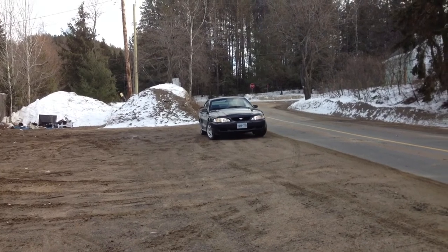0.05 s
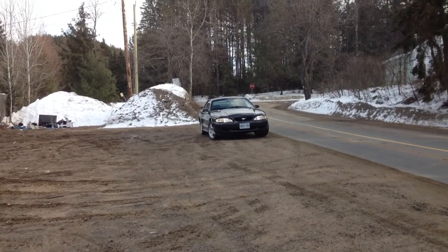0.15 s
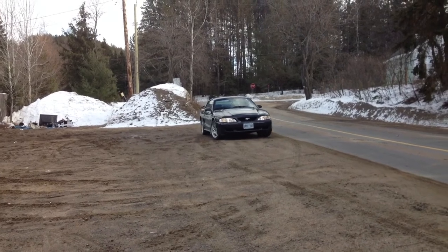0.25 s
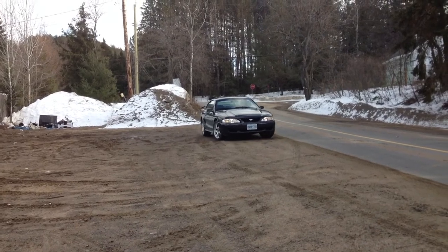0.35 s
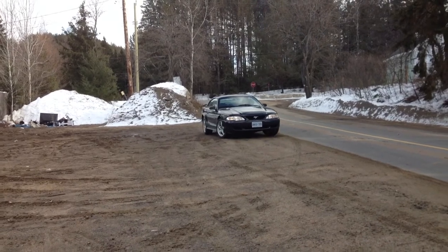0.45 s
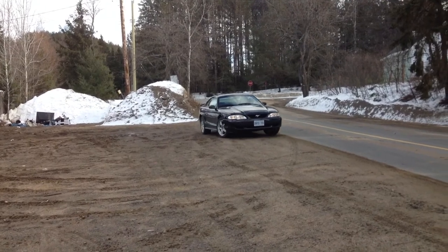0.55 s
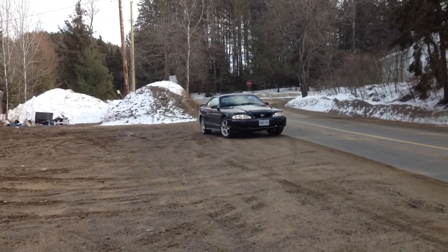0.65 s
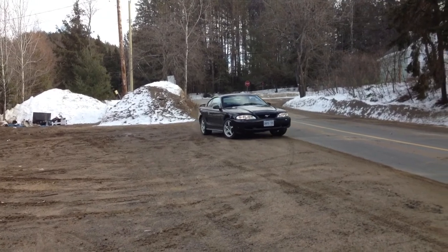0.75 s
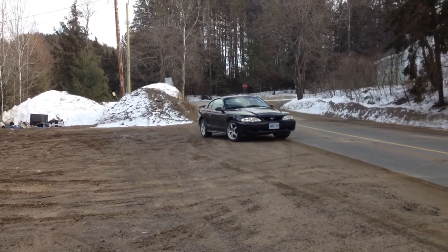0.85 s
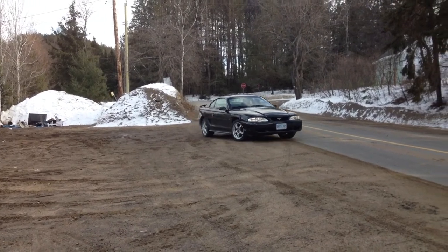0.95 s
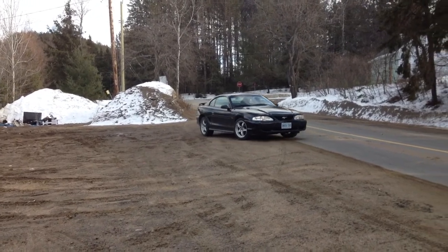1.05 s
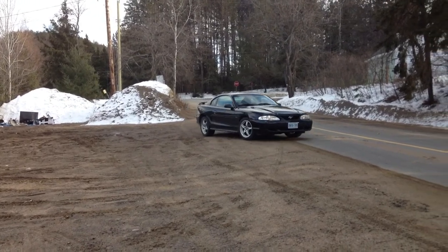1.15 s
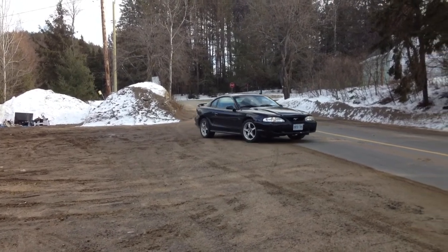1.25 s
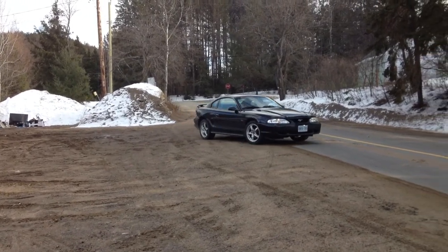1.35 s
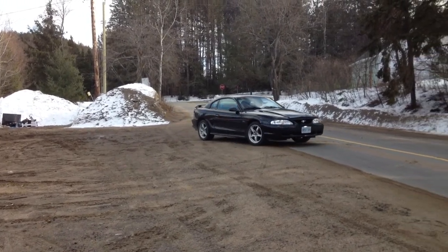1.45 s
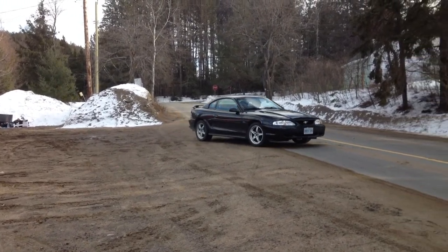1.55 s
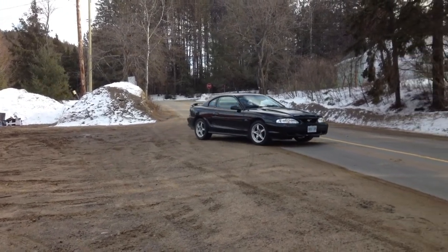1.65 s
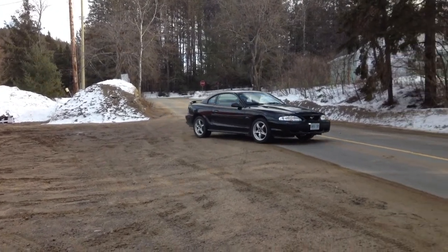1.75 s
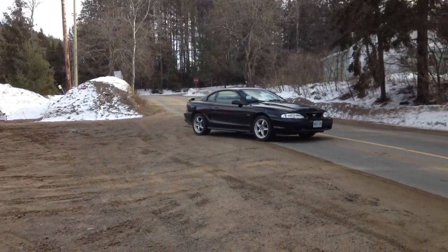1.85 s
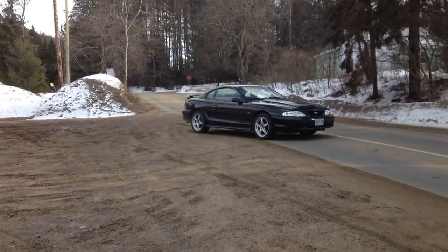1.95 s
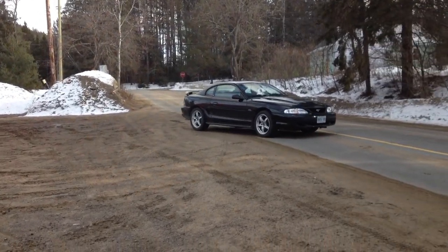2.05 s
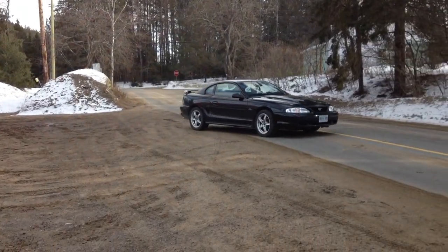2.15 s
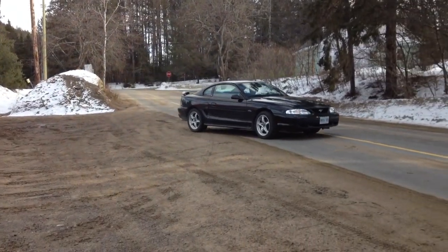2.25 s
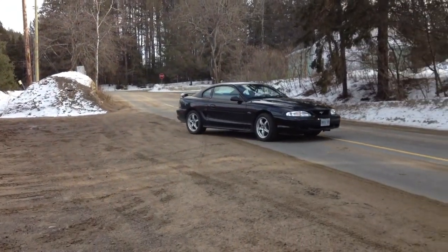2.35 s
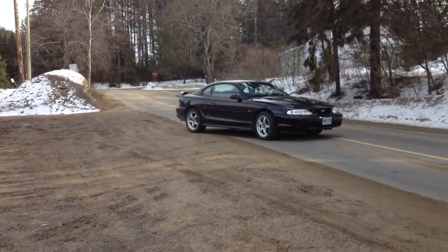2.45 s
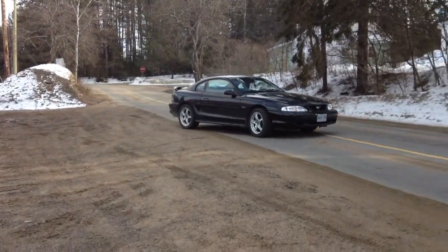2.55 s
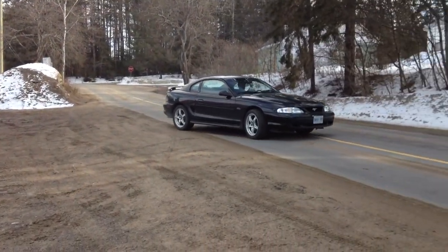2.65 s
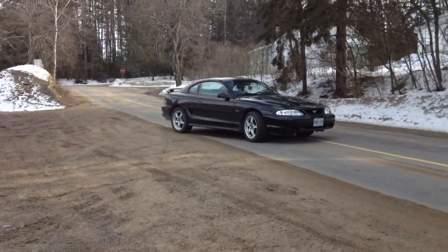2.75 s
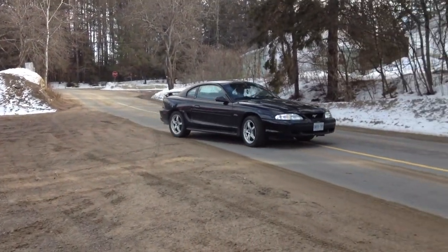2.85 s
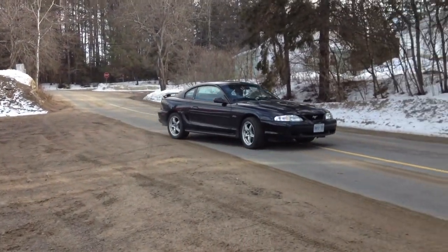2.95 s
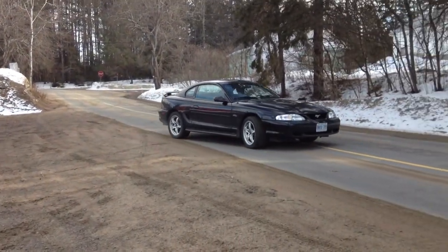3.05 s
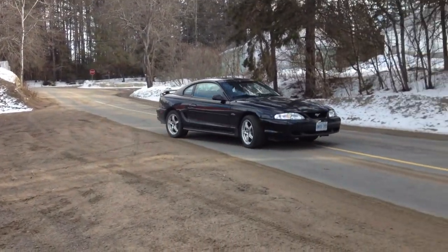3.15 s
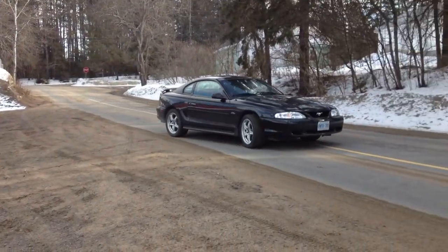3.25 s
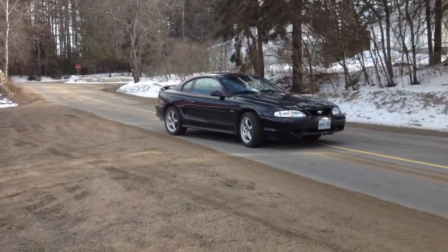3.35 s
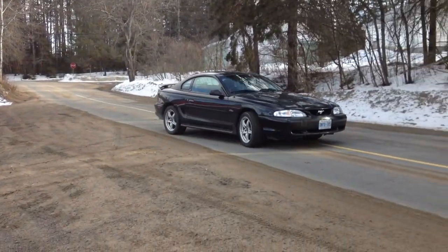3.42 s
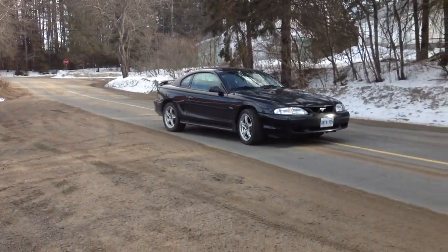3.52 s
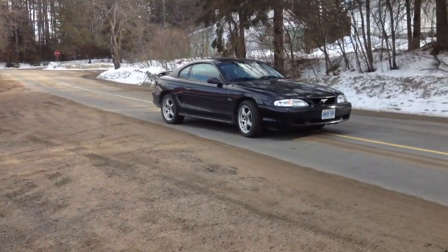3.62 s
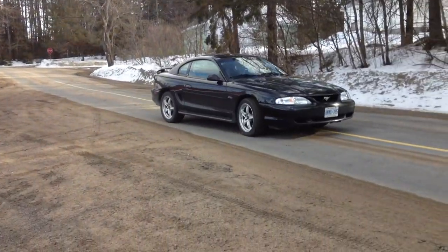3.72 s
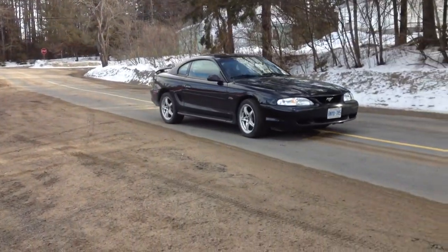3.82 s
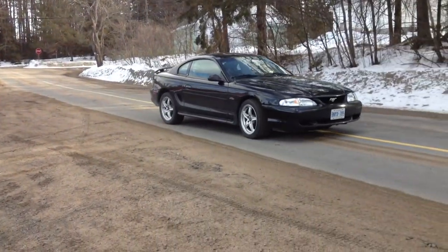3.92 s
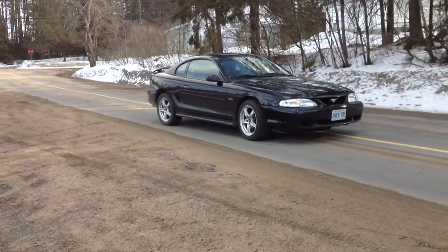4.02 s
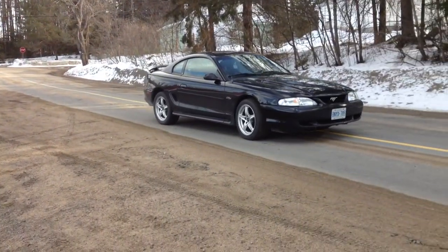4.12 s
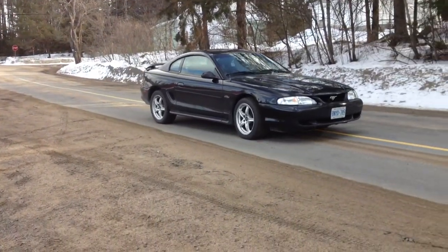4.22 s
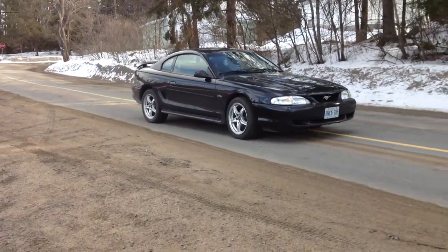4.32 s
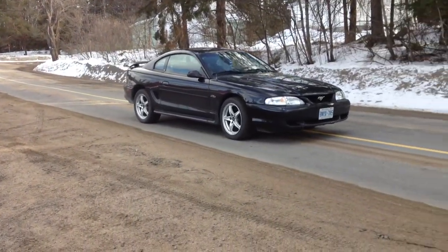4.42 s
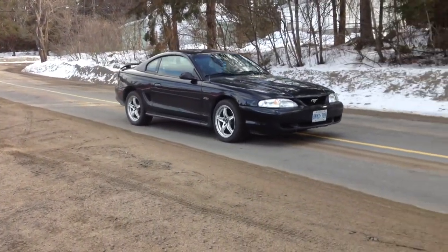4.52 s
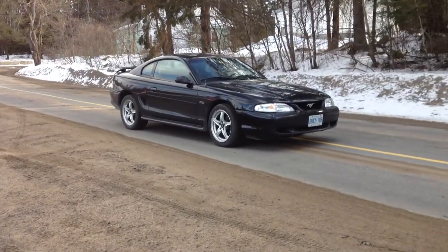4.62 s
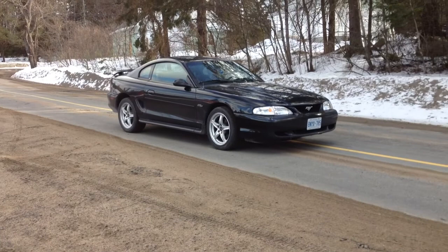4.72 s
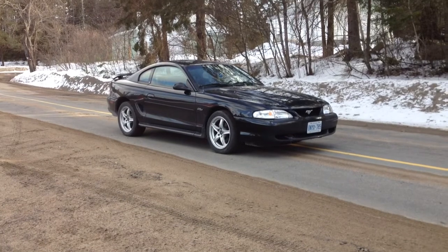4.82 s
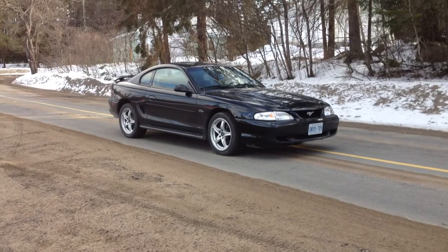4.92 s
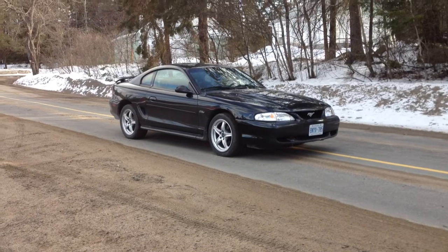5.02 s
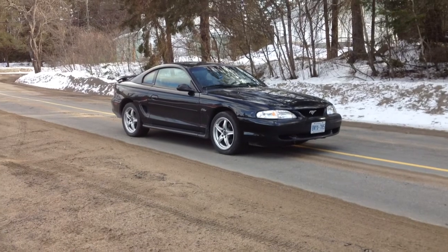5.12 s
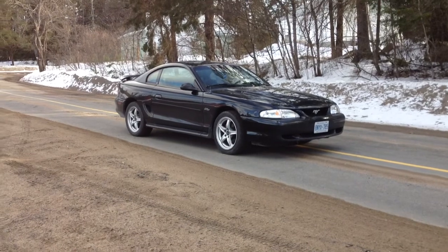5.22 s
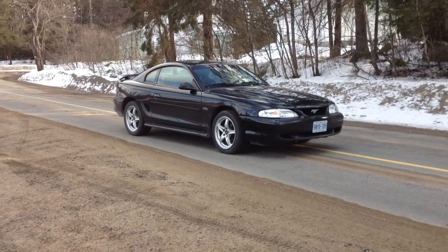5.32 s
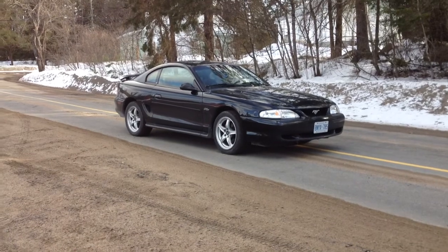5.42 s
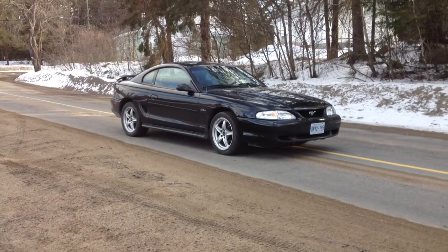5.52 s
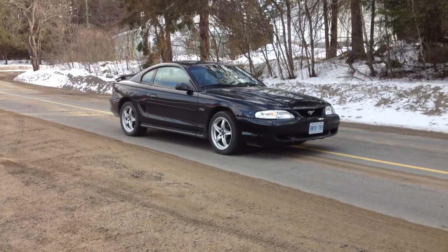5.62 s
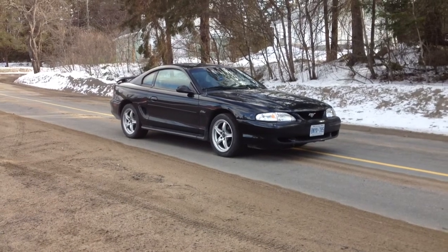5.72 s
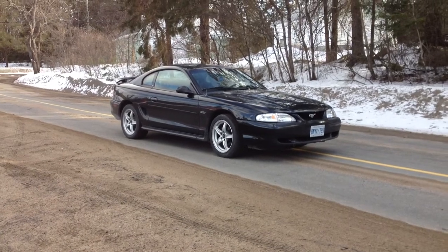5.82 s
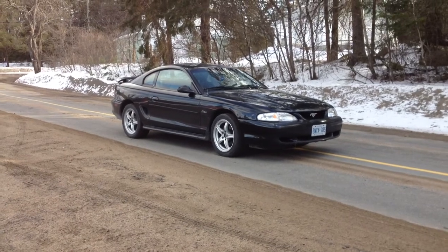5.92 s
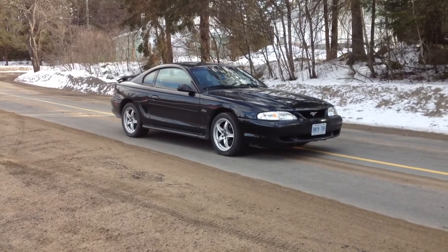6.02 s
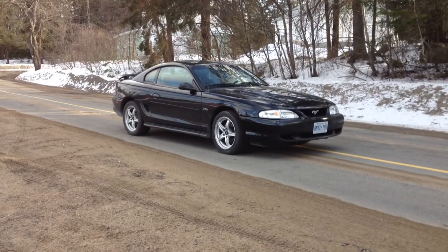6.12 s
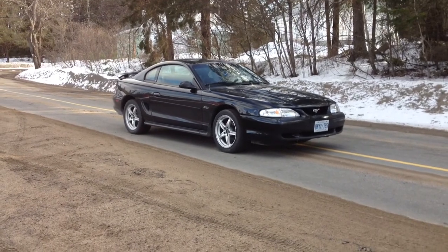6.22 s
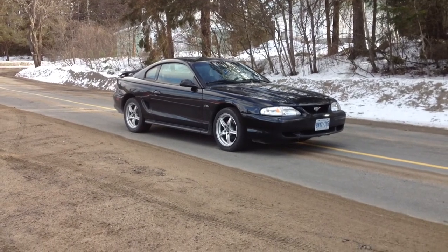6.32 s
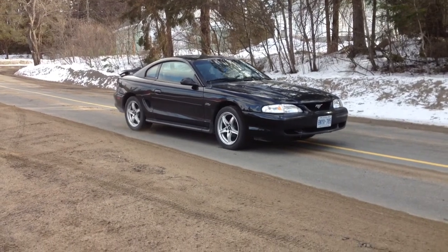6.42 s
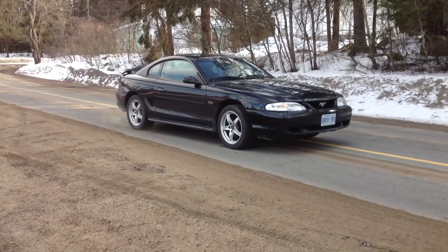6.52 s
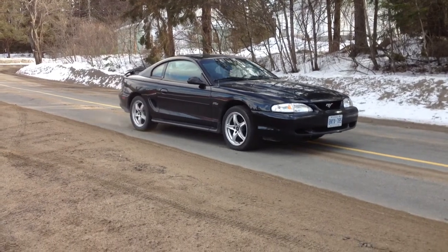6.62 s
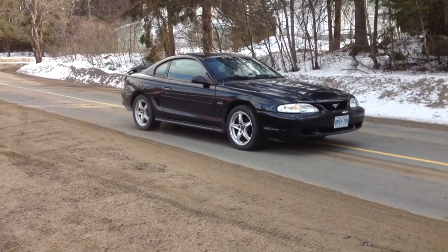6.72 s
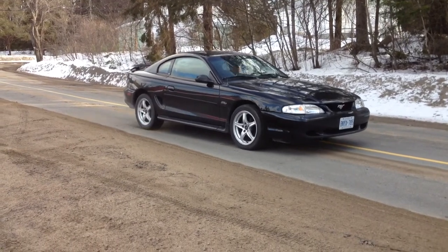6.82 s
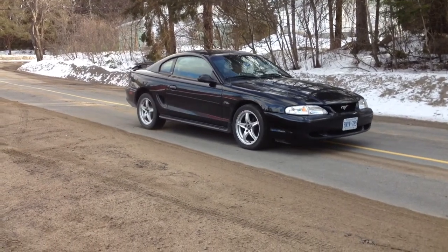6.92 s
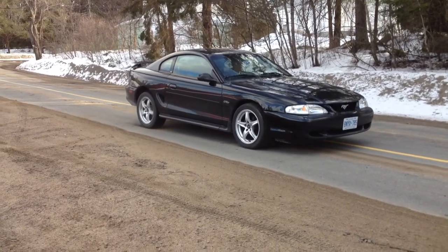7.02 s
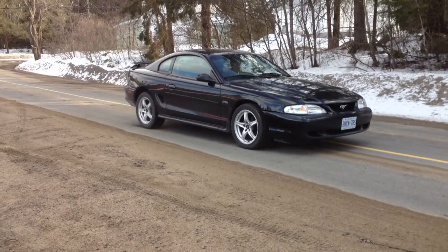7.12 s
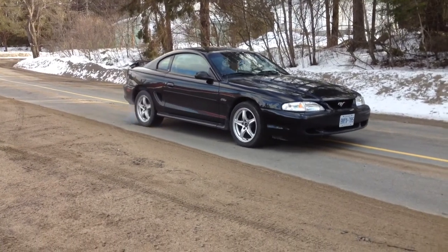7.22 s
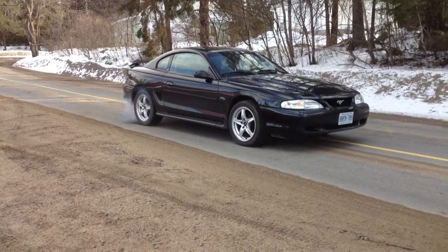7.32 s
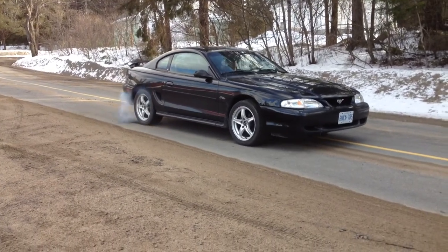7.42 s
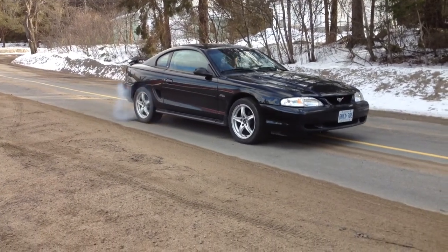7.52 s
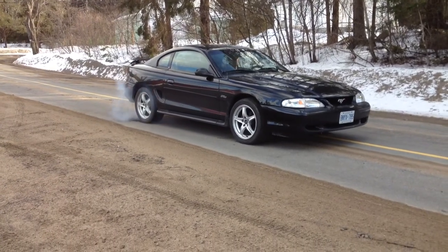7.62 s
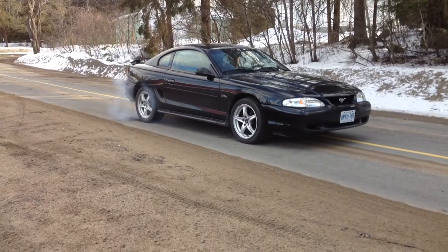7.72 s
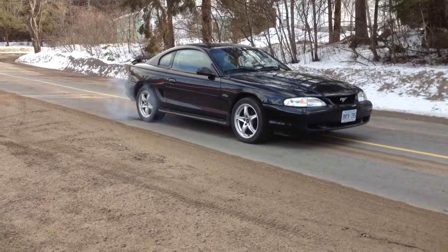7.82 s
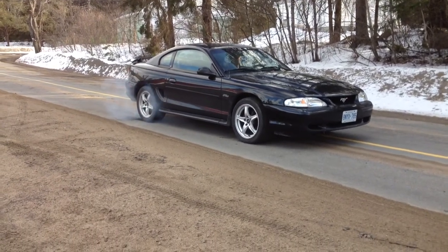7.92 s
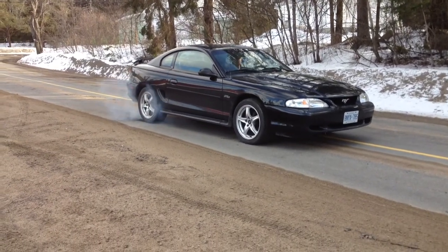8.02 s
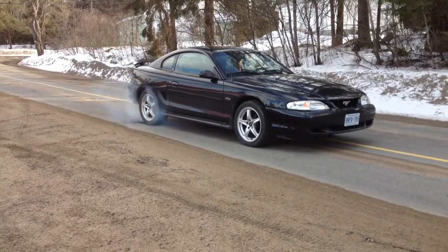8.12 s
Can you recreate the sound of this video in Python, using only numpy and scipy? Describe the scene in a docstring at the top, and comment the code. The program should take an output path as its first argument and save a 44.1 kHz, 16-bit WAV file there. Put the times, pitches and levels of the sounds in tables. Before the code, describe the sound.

Outdoors at a roadside, a small, bass-thin microphone hears a V8 coupe creep along gravel, its low exhaust droning in quick swells, stones cracking sharply. It settles to a quiet burbling idle under steady airy intake hiss. Near the end the throttle gulps open, revs leap into a loud raspy roar, and the rear tyres scrub and squeal. The note drops at a gear change, then climbs again, peaks slightly clipped.

```python
"""A V8 coupe creeps off a crackling gravel verge, its exhaust droning in surges, then idles with hissing intake.
The throttle gulps open, the revs leap, and the rear tyres break loose, scrubbing and squealing on asphalt.
A gear change drops the note before a second pull. Firing pulses ring exhaust resonances; sines follow the
crank; shaped noise makes air, rubber, rolling and a gravel crunch; damped sines make the stones.
A small microphone cuts the deep bass throughout and clips the loudest peaks."""
import sys
import numpy as np
from scipy import signal
from scipy.io import wavfile
from scipy.ndimage import uniform_filter1d

SR = 44100
rng = np.random.default_rng(int(sys.argv[2]) if len(sys.argv) > 2 else 0)


def amplitude_ratio(level_db):
    """Convert a level in decibels to the matching linear amplitude (field) ratio."""
    exponent = np.asarray(level_db, float) / 20
    return 10 ** exponent


def bounce(signal):
    """Save signal as a 16-bit WAV file at the path given by the first command-line argument."""
    frames = np.transpose(np.atleast_2d(signal))
    limited = np.clip(frames, -1, 1)
    pcm = np.round(limited * 32767).astype(np.int16)
    wavfile.write(sys.argv[1], SR, pcm)


N = 359856  # length in samples

# Engine speed through roll, idle, blip, wheelspin, gear change, second pull: [time_s, four_stroke_cycles_per_s]
ENGINE_SPEED = [(0, 9.3), (.25, 7.5), (1.6, 7.3), (2.4, 6.5), (3.0, 6.8), (3.4, 6.67), (4.2, 6.55),
                (5.66, 6.46), (5.8, 11), (5.95, 15.9), (6.05, 17), (6.15, 21.7), (6.36, 35.7), (6.45, 31.9),
                (6.53, 36), (6.58, 36), (6.66, 37.5), (7.0, 39.5), (7.115, 39.9), (7.295, 39.8),
                (7.39, 36.6), (7.59, 26.5), (7.7, 25.6), (7.83, 26.5), (8.08, 30), (8.16, 30.4)]
# Throttle load, uneven combustion and far pipe's share; below 0 the two pipes cancel the firing note:
# [time_s, load_0_to_1, pulse_spread_db, far_share_ratio]
RUNNING = [(0, .07, 1.5, .3), (1.5, .15, 1.8, .2), (3.3, .25, 1.7, -.1), (5.6, .36, 1.6, -.12),
           (5.75, .3, 2, .3), (5.95, .2, 2.6, .35), (6.12, .83, 3, .6), (6.4, .8, 1.5, .75),
           (6.6, .78, .7, .7), (6.8, .76, .5, .3), (7.28, .71, .5, .35), (7.37, .5, 1.8, -.6),
           (7.56, .5, 1.8, -.55), (7.66, 1, .8, .05), (7.96, .82, .7, .15), (8.04, .77, .7, .75),
           (8.16, .7, .7, .8)]
# Cross-plane firing order, which firings leave by the near pipe: [near_0_or_1], one per firing
NEAR_BANK = [1, 0, 0, 1, 0, 1, 1, 0]
# Cylinder differences, reached in full at 39 cycles per s: [strength_db], one per firing
CYLINDER_DB = [2, 8.5, 3.5, 7, 13.5, 4.5, 0.5, 7.5]
# Pulse pattern at idle, three strong beats a cycle with fainter ones between: [strength_db], one per firing
IDLE_DB = [0, -4, -4, 0, 11, 0, -7, -4]
# Pulse delay at idle: [lag_share_of_firing_gap], one per firing
IDLE_LAG = [0, 0, 0, -.45, 0, .22, .7, 0]

# Exhaust mix: [time_s, note_level_db, rasp_level_db]
EXHAUST_LEVEL = [(0, -28, -48), (.6, -35, -54), (1.1, -37.5, -49), (1.5, -45.5, -55), (2.1, -53.5, -72),
                 (3.1, -48, -64), (4.4, -48.5, -58.5), (5.64, -47, -54.5), (5.69, -40.5, -42.5),
                 (5.745, -35, -48.5), (5.77, -29.5, -38), (5.9, -27.5, -38.5), (6.04, -24.5, -36.5),
                 (6.17, -11, -25), (6.28, -9, -21.5), (6.43, -13.5, -22.5), (6.64, -12, -22),
                 (6.94, -16.5, -22), (7.23, -17.5, -25), (7.33, -18.5, -26), (7.39, -21, -29.5),
                 (7.46, -21.5, -30), (7.55, -27, -32), (7.76, -14.5, -22.5), (8.07, -9.5, -23.5),
                 (8.16, -27.5, -27.5)]
# Silencer modes: [pitch_hz, width_hz, light_load_db, full_load_db]
SILENCER_MODES = [(128, 17, -0.5, -16), (169.8, 12.2, 1.5, -8.5), (188.3, 5.3, 11.5, 4.5),
                  (235, 22.3, -5.5, -0.5), (300, 39.3, -5, 3), (305, 46, -6.5, -4)]
# Extra weight of the longest-ringing mode and of the two lowest: [time_s, drone_db, boom_db]
DRONE_BOOM = [(0, 3, 6), (.4, 8, 2), (1.3, 2, -2.5), (2.2, -5.5, 0), (3.8, -8, -2), (5.0, -9, -1),
              (5.8, -6, 1.5), (8.16, 0.2, -1.5)]
# Tailpipe and floor pan resonances: [pitch_hz, width_hz, level_db]
RASP_MODES = [(370, 43, 5.5), (495, 41, 2.5), (559, 39, -6), (678, 35, 1.5), (837, 73, -1),
              (1058, 110, 3.5), (1102, 129, 2), (1360, 138, 0), (1860, 840, -9.5), (2055, 74, -6.5),
              (2280, 240, -31)]
# Turbulent tailpipe roar, least at steady full speed: [time_s, share_beside_pulses_ratio]
ROAR_SHARE = [(0, 2.5), (3.3, 1.8), (5.6, 1.8), (5.68, 3.5), (5.9, 2.8), (6.25, 2.4), (6.6, .9), (6.9, .7),
              (7.28, .7), (7.37, 1.2), (7.7, 1.5), (8.16, 1.4)]

# Upper multiples of the cycle, clean at full speed: [multiple_of_cycle_rate, relative_db]
FULL_SPEED_LINES = [(13, -15), (16, -21), (17, -13), (18, -1.5), (19, -6), (21, 5), (22, -7), (24, -0.5),
                    (25, -6), (26, -11), (29, 5), (33, -3), (35, -1), (39, -9), (53, 4), (61, -14),
                    (71, -4), (83, -0.5)]
# Their common level: [time_s, level_db]
FULL_SPEED_LEVEL = [(6.4, -67), (6.65, -38), (6.9, -35.5), (7.05, -30.5), (7.28, -34.5), (7.34, -44),
                    (7.45, -65)]
# Multiples that stand out in the second pull: [multiple_of_cycle_rate, relative_db]
SECOND_PULL_LINES = [(23, -2), (28, 0), (32, 6), (36, 1)]
# Their common level: [time_s, level_db]
SECOND_PULL_LEVEL = [(7.6, -70), (7.88, -46), (7.96, -34), (8.05, -34), (8.12, -50)]

# Spinning tyres: [time_s, scrub_level_db, hiss_level_db]
TYRE_LEVEL = [(5.72, -50, -63), (5.79, -49, -45.5), (5.85, -39.5, -40.5), (6.07, -46, -34.5),
              (6.13, -53, -36.5), (6.27, -36, -33.5), (6.35, -30.5, -36), (6.4, -23.5, -22),
              (6.5, -24.5, -23.5), (6.63, -22, -29.5), (6.8, -25, -27.5), (6.95, -18.5, -25),
              (7.23, -22.5, -28.5), (7.33, -22, -31), (7.6, -24, -32.5), (7.74, -26, -32.5),
              (7.98, -24, -31.5), (8.16, -23.5, -31)]
# Tone of the rubber scrub: [pitch_hz, relative_db_per_hz]
SCRUB_COLOUR = [(300, -24), (600, -20.5), (900, -14), (1150, -6), (1300, -1), (1500, 0), (1930, -1.5),
                (2200, -8), (2700, -6.5), (3400, -12), (4500, -20.5), (6000, -40)]
# Tone of the fine rubber hiss: [pitch_hz, relative_db_per_hz]
HISS_COLOUR = [(1650, -11), (2800, -7), (3050, -11.5), (3320, -9), (3800, -11), (6960, -7.5), (8680, -10.5),
               (9790, -15.5), (12900, -14), (15300, -24.5)]
# Singing tread: [time_s, level_over_scrub_db]
SQUEAL_LEVEL = [(6.1, -13), (6.29, 7), (6.43, -21), (6.69, -5.5), (6.98, -6), (7.07, -38), (7.6, -9.5),
                (7.75, 2), (7.88, -24), (8.06, 0.5), (8.16, -5)]
# Brief tread chirps: [start_s, length_s, start_pitch_hz, end_pitch_hz, level_db]
CHIRPS = [(7.03, 0.067, 1547, 1560, -22), (7.2, 0.069, 1777, 1780, -20), (7.21, 0.05, 1580, 1574, -17),
          (7.3, 0.062, 1513, 1460, -21), (7.37, 0.084, 1474, 1500, -21), (7.48, 0.096, 1600, 1586, -26)]

# Air sucked past the nearly shut throttle: [time_s, level_db]
INTAKE_LEVEL = [(0, -53), (.17, -45.5), (.27, -66), (.37, -63), (.46, -41), (.7, -70), (.85, -53),
                (.97, -43.5), (2.4, -41.5), (2.75, -38.5), (3.9, -37.5), (4.0, -35.5), (4.6, -36.5),
                (4.85, -37.5), (5.58, -38), (5.72, -47)]
# Tone of its broad hiss: [pitch_hz, relative_db_per_hz]
INTAKE_COLOUR = [(1530, -57), (2600, -60), (2740, -54), (2910, -35), (4470, -22), (5150, -8), (5710, -15),
                 (6670, -6.5), (7920, -6.5), (8400, -0.5), (9750, -8.5), (10650, 3.5), (11000, 12),
                 (11400, 0), (12200, -8), (15300, -54)]
# Fuzzy intake whistles: [pitch_hz, width_hz, relative_db]; narrow widths are raised to a floor
WHISTLES = [(1078, 25, -15), (2836, 39, -10.5), (2980, 110, -11), (3140, 71, -10.5), (3315, 160, -14.5),
            (3394, 74, -13), (3750, 56, -19), (5100, 54, -17), (5270, 29, -15), (6800, 38, -17),
            (8780, 70, -6.5), (9100, 41, -18), (9960, 55, -18)]
# Whistles sink at first, then clear up as the idle settles: [time_s, relative_db]
WHISTLE_RISE = [(0, -14), (1.2, -41), (2.8, -1.5), (4.3, 2), (5.7, 3)]
# Short bursts of hiss, a crunch of gravel at 1.8 s, then gulps of intake air: [centre_s, level_db, length_s]
HISS_BURSTS = [(1.806, -42, 0.14), (4.256, -40, 0.036), (4.578, -43, 0.039), (5.684, -32.5, 0.054)]
# Tone of these bursts: [pitch_hz, relative_db_per_hz]
BURST_COLOUR = [(600, -30), (1400, -13), (2400, -12), (2900, -12), (4500, -17.5), (7000, -10), (11000, -20),
                (15400, -26)]

# Engine bay rush and clatter: [time_s, level_db]
BAY_LEVEL = [(0, -38), (.94, -38), (1.25, -42.5), (1.7, -41.5), (2.5, -41), (3.7, -39.5), (4.3, -42),
             (4.6, -43.5), (5.6, -45.5), (5.69, -43), (5.75, -37)]
# Its tone: [pitch_hz, relative_db_per_hz]
BAY_COLOUR = [(40, -40), (100, -6), (190, -3), (330, -7), (509, -10.5), (749, -4.5), (1080, -4), (1250, -3),
              (1420, 2), (1650, 2.5), (2050, -1), (2600, -4.5), (6440, -10.5), (9780, -9.0), (10900, -13),
              (13900, -16.5), (15300, -12.5)]
# Thin high squeaks: [start_s, length_s, start_pitch_hz, end_pitch_hz, level_db]
SQUEAKS = [(0.287, .06, 15400, 14000, -35), (0.238, 0.13, 12000, 12100, -45),
           (.52, 0.065, 13200, 12000, -45), (.59, 0.2, 14400, 12700, -43),
           (0.593, 0.099, 15300, 14600, -34), (6.049, 0.042, 12700, 11600, -34)]
# Stones and grit cracking under the slow wheels: [start_s, peak_db, pitch_hz]
STONES = [(0.5607, -15, 2500), (1.518, -32, 4030), (1.689, -22, 7000), (1.7544, -12.5, 5730),
          (1.783, -24, 1700), (1.815, -22, 2000), (1.841, -17, 5500), (1.8875, -24, 2200),
          (1.895, -18, 1810), (1.918, -27, 2000), (2.082, -20, 4000), (2.351, -26, 2500)]
# Wheels rolling over the gravel verge: [time_s, level_db]
ROLL_LEVEL = [(0, -37), (.3, -43), (.85, -40), (1.3, -45), (1.9, -52)]
# Tone of the rolling: [pitch_hz, relative_db_per_hz]
ROLL_COLOUR = [(85, -27), (130, 7), (260, 2.5), (450, -6.5), (700, -7.5), (1200, -45)]


def at(table):
    """Columns of a curve table, one value per sample."""
    s, *columns = np.transpose(table)
    return [np.interp(np.arange(N) / SR, s, column) for column in columns]


def evened(x, span=None):
    """Scales to rms 1, over the whole sound or over a sliding span of samples."""
    power = uniform_filter1d(x ** 2, span) if span else np.mean(x ** 2)
    return x / np.sqrt(abs(power) + 1e-20)


def resonate(x, hz, width):
    """A single resonance of gain 1, its width in Hz."""
    r = np.exp(-np.pi * width / SR)
    poles = [1, -2 * r * np.cos(2 * np.pi * hz / SR), r * r]
    return signal.lfilter([(1 - r * r) / 2, 0, (r * r - 1) / 2], poles, x)


def resonate_twice(x, hz, width):
    """Two equal resonances in a row, for steeper skirts."""
    return resonate(resonate(x, hz, width), hz, width)


def noise(colour, patchy_db):
    """Noise of a given colour whose level drifts in patches of time and pitch."""
    hz = np.fft.rfftfreq(1024, 1 / SR)
    colour_hz, colour_db = np.transpose(colour)
    real, imaginary, patches = rng.standard_normal((N // 256 + 5, 513, 3)).T
    patches = evened(uniform_filter1d(uniform_filter1d(patches, 20, 0), 12, 1))
    curve = np.interp(np.log(hz + 1), np.log(colour_hz), colour_db, left=-90)
    spectrum = (real + 1j * imaginary) * amplitude_ratio(curve[:, None] + patchy_db * patches)
    return evened(signal.istft(spectrum, nperseg=1024, noverlap=768)[1][:N])


def wander(span_s):
    """Slow random drift of rms 1."""
    size = round(span_s * SR)
    return evened(uniform_filter1d(uniform_filter1d(rng.standard_normal(N), size), size))


def fade(t0, t1):
    """1 between the two times, with soft edges of 0.05 s."""
    t = np.arange(N) / SR
    return np.clip(np.minimum(t - t0, t1 - t) / 0.05, 0, 1)


def firings():
    """One pulse per firing, eight a cycle; the near bank's uneven rhythm makes the burble."""
    far_bank_delay_s = 0.0003
    timing_spread, timing_power = .017, 1.3  # share of the firing gap at 1 dB spread; more when rougher
    turns = 8 * np.cumsum(at(ENGINE_SPEED)[0]) / SR
    count = np.arange(1, int(turns[-1]))
    sample = np.interp(count, turns, np.arange(N))
    cylinder = count % 8
    s, _, spread_db, far_share = np.transpose(RUNNING)
    spread_db = np.interp(sample / SR, s, spread_db)
    far_share = np.interp(sample / SR, s, far_share)
    speed = np.interp(sample / SR, *np.transpose(ENGINE_SPEED))
    idle = np.clip((9 - speed) / 2, 0, 1)  # full below 7 cycles per s, gone above 9
    timing_chance, size_chance = rng.standard_normal((len(count), 2)).T
    near = np.array(NEAR_BANK)[cylinder]

    running_db = (1 - idle) * np.array(CYLINDER_DB)[cylinder] * speed / 39
    idle_db = idle * np.array(IDLE_DB)[cylinder]
    size = amplitude_ratio(running_db + idle_db + spread_db * size_chance)
    size *= near + (1 - near) * far_share

    scatter = timing_spread * spread_db ** timing_power * timing_chance
    lag = idle * np.array(IDLE_LAG)[cylinder]
    sample += np.gradient(sample) * (scatter + lag) + (1 - near) * far_bank_delay_s * SR

    # each pulse is shared between its two nearest samples
    whole, pulses = np.clip(sample.astype(int), 0, N - 2), np.zeros(N)
    np.add.at(pulses, whole, size * (1 - sample % 1))
    np.add.at(pulses, whole + 1, size * (sample % 1))
    return pulses


def creeping_surge():
    """Regular swells while the car creeps, a weaker one between each two strong ones."""
    period_s, first_crest_s, end_s = 0.226, 0.14, 1.8
    angle = 2 * np.pi * (np.arange(N) / SR - first_crest_s) / period_s
    return (np.cos(angle) + 1.2 * np.cos(2 * angle)) * fade(-1, end_s)


def silencer_note(pulses, load, surge):
    """Pulses ring the silencer, which stops sharply above its last mode; throttle wakes the upper modes."""
    running = np.r_[pulses[:SR // 4], pulses]  # the engine already turns at time zero
    drone_db, boom_db = at(DRONE_BOOM)
    drone_db = drone_db + 0.5 * surge
    note = np.zeros(N)
    for k, (hz, width, light_db, full_db) in enumerate(SILENCER_MODES):
        mode_db = light_db + load * (full_db - light_db) + (k == 2) * drone_db + (k < 2) * boom_db
        note += (-1) ** k * amplitude_ratio(mode_db) * resonate(running, hz, width)[-N:]
    note = signal.sosfilt(signal.ellip(6, 1, 38, 330, fs=SR, output="sos"), note)
    # the deep bass thins out as speed rises past 35 cycles per s
    thinning = np.clip((at(ENGINE_SPEED)[0] - 35) / 13, 0, 1)
    deep_bass = signal.sosfiltfilt(signal.butter(3, 100, fs=SR, output="sos"), note)
    return evened(note - thinning * deep_bass, 8000)


def tailpipe_rasp(pulses, load):
    """Scattered pulses and puffing, turbulent roar ring the tailpipe and floor pan."""
    echo_t60_s, echo_db = .03, -29  # ground, body and verge scatter each pulse
    puff_decay_s, puff_share = .005, .35  # one puff after each firing
    echoes = rng.standard_normal(3000) * amplitude_ratio(echo_db - 60 * np.arange(3000) / SR / echo_t60_s)
    scattered = evened(pulses + signal.oaconvolve(pulses, echoes)[:N], 8000)
    puffs = evened(signal.lfilter([1], [1, -np.exp(-1 / (puff_decay_s * SR))], abs(pulses)), 8000)
    roar = at(ROAR_SHARE)[0] * (1 - puff_share + puff_share * puffs) * rng.standard_normal(N)
    drive = signal.sosfilt(signal.butter(3, 360, "high", fs=SR, output="sos"), scattered + roar)
    rasp = np.zeros(N)
    for k, (hz, width, db) in enumerate(RASP_MODES):
        sink_db = (k < 2) * 9 * load  # the two lowest modes sink under load
        rasp += (-1) ** k * amplitude_ratio(db - sink_db) * resonate(drive, hz, width)
    return evened(rasp, 8000)


def exhaust(pulses):
    """Silencer note and tailpipe rasp; the note lopes at light load and throbs with the creeping surge."""
    note_db, rasp_db = at(EXHAUST_LEVEL)
    load = at(RUNNING)[0]
    surge = creeping_surge()
    lope_db = 1.8 * (1 - load) ** 2 * wander(.1) + 1.6 * surge
    note = amplitude_ratio(note_db + lope_db) * silencer_note(pulses, load, surge)
    return note + amplitude_ratio(rasp_db) * tailpipe_rasp(pulses, load)


def orders(table, level):
    """Partials locked to the slightly shivering crank, each swelling on its own."""
    shiver_cycles, swell_db = .0015, 3.2
    turns = 2 * np.pi * (np.cumsum(at(ENGINE_SPEED)[0]) / SR + shiver_cycles * wander(0.022))
    lines = np.zeros(N)
    for multiple, db in table:
        phase = 2 * np.pi * rng.random()
        lines += amplitude_ratio(db + swell_db * wander(0.043)) * np.sin(multiple * turns + phase)
    return amplitude_ratio(at(level)[0]) * lines * fade(level[0][0], level[-1][0] + .05)


def settling():
    """One low partial, 16 times the cycle rate, glides down and fades as the revs settle at the start."""
    level_db, t60_s = -30, 0.82
    turns = 2 * np.pi * np.cumsum(at(ENGINE_SPEED)[0]) / SR
    return amplitude_ratio(level_db - 60 * np.arange(N) / SR / t60_s) * np.sin(16 * turns)


def tyres():
    """Rubber scrubs and sings in the middle and hisses on top, all with a gritty flicker."""
    squeal_hz, squeal_width_hz, stutter_db = 1365, 80, 3
    scrub_db, hiss_db = at(TYRE_LEVEL)
    grit = evened(amplitude_ratio(0.69 * evened(uniform_filter1d(rng.standard_normal(N), 150))))
    scrub = noise(SCRUB_COLOUR, patchy_db=1.5)
    squeal = evened(resonate_twice(scrub, squeal_hz, squeal_width_hz), 6000)
    squeal *= amplitude_ratio(at(SQUEAL_LEVEL)[0] + stutter_db * wander(0.029))
    sound = amplitude_ratio(scrub_db) * (scrub + squeal) + amplitude_ratio(hiss_db) * noise(HISS_COLOUR, patchy_db=1.0)
    return grit * sound * fade(5.71, 9)


def squeaks(table, size):
    """Narrow gliding noise; a longer smoothing size in samples makes it purer."""
    out = np.zeros(N + SR)
    for s, length, start_hz, end_hz, db in table:
        n = round(length * SR)
        fuzz = evened(1 + uniform_filter1d(rng.standard_normal(SR), size) * 100 / np.sqrt(size))[:n]
        glide = np.sin(2 * np.pi * np.cumsum(np.linspace(start_hz, end_hz, n)) / SR)
        out[round(s * SR):][:n] += amplitude_ratio(db) * np.hanning(n) * fuzz * glide
    return out[:N]


def intake_hiss():
    """Wavering broad hiss and fuzzy whistles of sucked air, until the throttle opens."""
    air = noise([(1000, 0), (16000, 0)], patchy_db=.6)
    whistles = np.zeros(N)
    for hz, width, db in WHISTLES:
        whistle = evened(resonate_twice(air, hz, max(width, 28)), 12000)
        whistles += amplitude_ratio(db + 1.2 * wander(0.055)) * whistle  # each comes and goes on its own
    hiss = amplitude_ratio(at(WHISTLE_RISE)[0] - 9) * whistles + noise(INTAKE_COLOUR, patchy_db=1.0)
    return amplitude_ratio(at(INTAKE_LEVEL)[0] + 1.2 * wander(0.036)) * hiss * fade(-1, 5.68)


def hiss_bursts():
    """Bell-shaped bursts of noise with one ringing band: a crunch of gravel, then gulps of intake air."""
    ring_hz, ring_width_hz, ring_db = 2850, 110, -8
    t = np.arange(N) / SR
    hiss = noise(BURST_COLOUR, patchy_db=1.2)
    ring = amplitude_ratio(ring_db) * evened(resonate(hiss, ring_hz, ring_width_hz), 2000)
    bursts = sum(amplitude_ratio(db) * np.exp(-(2 * (t - s) / length) ** 2) for s, db, length in HISS_BURSTS)
    return bursts * (hiss + ring)


def bay(pulses):
    """Rush of fan and belts, pulsing a little with each firing."""
    beat = evened(uniform_filter1d(signal.lfilter([1], [1, -.997], abs(pulses)), 60), 8000)
    return amplitude_ratio(at(BAY_LEVEL)[0]) * (1 + .05 * beat) * noise(BAY_COLOUR, patchy_db=1.3) * fade(-1, 5.76)


def gravel():
    """Each stone cracks with a damped ring of its own pitch, down 60 dB after four cycles."""
    out, t = np.zeros(N + 400), np.arange(400) / SR
    for s, db, hz in STONES:
        out[round(s * SR):][:400] += amplitude_ratio(db - 60 * t * hz / 4) * np.sin(2 * np.pi * hz * t)
    return out[:N]


def rolling():
    """Lumpy low rumble that dies as the car reaches the asphalt."""
    return amplitude_ratio(at(ROLL_LEVEL)[0]) * noise(ROLL_COLOUR, patchy_db=2.5) * fade(-1, 1.9)


def scene():
    """All sources, summed at one microphone."""
    pulses = firings()
    engine = exhaust(pulses) + settling() + bay(pulses) + intake_hiss()
    engine += orders(FULL_SPEED_LINES, FULL_SPEED_LEVEL) + orders(SECOND_PULL_LINES, SECOND_PULL_LEVEL)
    rubber = tyres() + squeaks(CHIRPS, size=600)
    verge = rolling() + gravel()
    return (engine + rubber + hiss_bursts() + squeaks(SQUEAKS, size=90) + verge)[None]


def band_limit(x):
    """A steep low-pass at the top of the band."""
    return signal.sosfilt(signal.butter(12, 15480, fs=SR, output="sos"), x)


def record(dry):
    """Bass cut of the microphone, then a hard knee on the peaks."""
    bass_cut_hz, clip_db = 98, -3
    x = signal.sosfilt(signal.butter(3, bass_cut_hz, "high", fs=SR, output="sos"), dry)
    x = x / (1 + abs(x / amplitude_ratio(clip_db)) ** 20) ** (1 / 20)
    return band_limit(x)


dry = scene()
out = record(dry)
bounce(out)
```